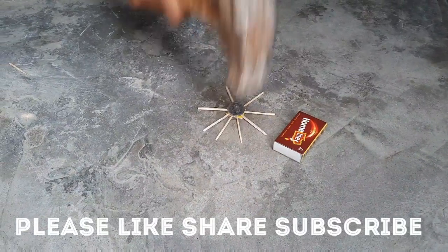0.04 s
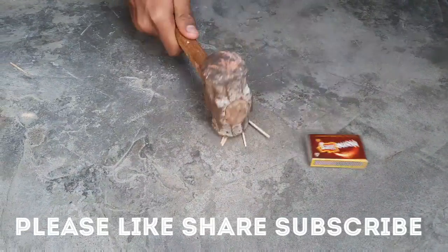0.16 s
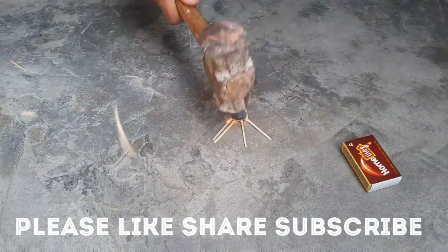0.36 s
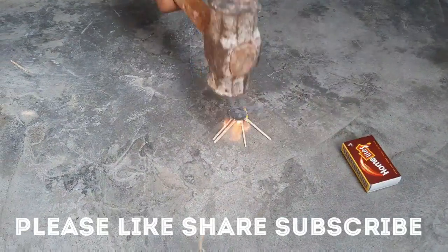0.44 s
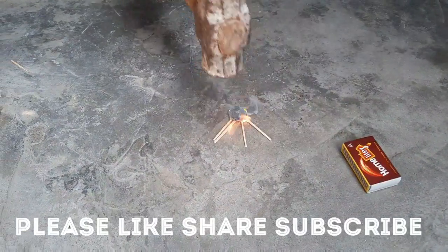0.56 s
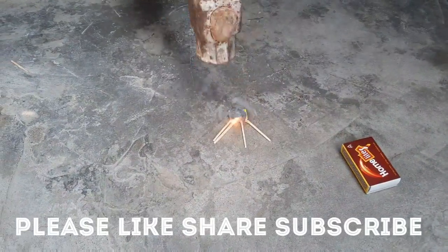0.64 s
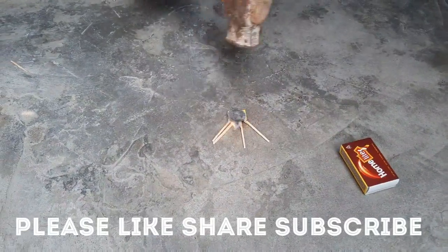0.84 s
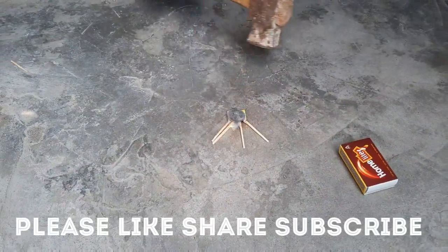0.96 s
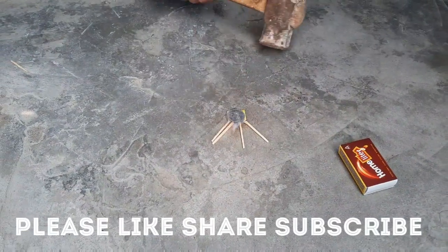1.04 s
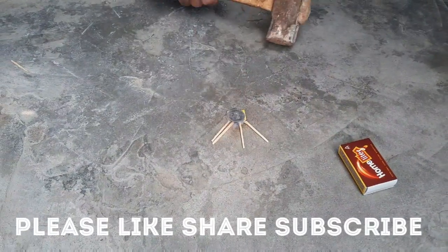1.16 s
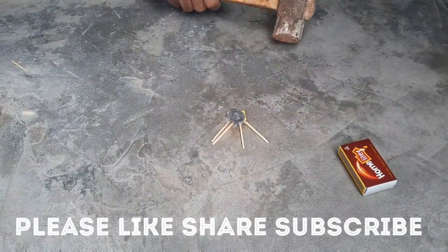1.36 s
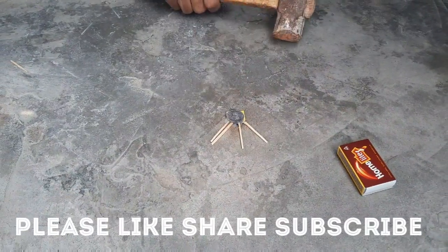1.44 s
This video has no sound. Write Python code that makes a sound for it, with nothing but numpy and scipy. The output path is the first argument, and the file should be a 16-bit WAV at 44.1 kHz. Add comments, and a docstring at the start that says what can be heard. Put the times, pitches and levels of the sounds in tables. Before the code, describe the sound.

One loud, echoing bang of match heads exploding under a hammer, then a few soft thuds.

```python
"""Sledgehammer on match heads

A hammer blow detonates a heap of match heads on a concrete floor. The crack overloads the microphone
and excites a hard room; the recorder's gain ducks and recovers slowly. Metal rings on in its normal
modes while the matches flare and sputter out. The hammer is then set down with three dull knocks."""
import sys
import numpy as np
from scipy import signal
from scipy.fft import rfft, irfft
from scipy.io import wavfile
from scipy.ndimage import uniform_filter1d

SR = 44100
rng = np.random.default_rng(int(sys.argv[2]) if len(sys.argv) > 2 else 0)


def generate_wav(signal):
    """Clip the signal to [-1, 1] and save it as 16-bit WAV at the path in sys.argv[1]."""
    frames = np.transpose(np.atleast_2d(signal))
    scaled = np.clip(frames, -1, 1) * 32767
    pcm = np.round(scaled).astype(np.int16)
    wavfile.write(sys.argv[1], SR, pcm)


N = 66150
T = np.arange(N) / SR
FREQS = np.maximum(np.arange(N // 2 + 1) * SR / N, 1)
CONTACT_S, DETONATION_S = .2353, .2371

# Left-right coherence of the sound field: f/Hz, coherence
COHERENCE = [(40, .9), (150, 0.96), (350, 0.54), (800, 0.39), (2000, 0.04), (16000, .01)]
# Room rumble and microphone hiss: f/Hz, octave level/dB
BACKGROUND_SPECTRUM = [(25, -79.5), (45, -62.5), (70, -47), (130, -46.5), (280, -47.5), (500, -59.5),
                       (1000, -72.5), (2500, -72), (5500, -70), (8100, -66), (9500, -72.5), (16000, -75.5)]
# Direct blast: f/Hz, octave level/dB
BLAST_SPECTRUM = [(30, -23.5), (60, -5), (200, 2), (700, -3), (2000, 5.5), (4500, 1), (8000, 4.5),
                  (16000, 6.5)]
# Reverberation: f/Hz, early octave level/dB, early T60/s, late octave level/dB, late T60/s
ROOM_DECAY = [(30.64, -45.5, 0.24, -62.5, .8), (65, -26, 0.14, -31.5, 1.0), (139, -19, 0.8, -27.5, 1.9),
              (303.2, -17, 0.68, -21.5, 1.15), (594, -5, 0.27, -20, 1.05), (1089, 0, 0.29, -15.5, 0.88),
              (2400, 3, 0.15, -10.5, 0.78), (3950, -4, 0.25, -21, 0.88), (8100, -10.5, .27, -22, .82),
              (16000, -21.5, .2, -34, .8)]
# Metal excited by the blow: f/Hz, level/dB, T60/s
METAL_MODES = [(355.3, -27, 1.55), (673, -18, .6), (787, -31, 2.2), (829, -32, 1.4), (931, -23, .85),
               (983, -16, .8), (1238, -36, 1.4)]
# Blast reflected by the walls: f/Hz, octave level/dB
ECHO_SPECTRUM = [(30, -22.5), (55, -3.5), (90, -12.5), (300, -5.5), (600, 0.5), (1200, 3.5), (2300, 6.5),
                 (4000, -1.5), (8000, -6.5), (16000, -8.5)]
# Burning match heads: f/Hz, octave level/dB
FLAME_SPECTRUM = [(500, -27), (2000, -5.5), (4000, -7), (8000, -3), (10500, 1), (13500, 0), (16000, 4)]
# Flares of the flame: t/s, duration/s, gain/dB
FLAME_FLARES = [(.42, 0.14, -46), (0.567, 0.044, -43.5), (0.687, 0.064, -51), (0.807, 0.032, -71)]
# Spits of the flame: t/s, gain/dB
FLAME_SPITS = [(0.8842, -44.5), (.9231, -55), (.9849, -71), (.9984, -48), (1.004, -64), (1.019, -50),
               (1.0403, -50), (1.0742, -50)]
# Hammer meeting the floor: t/s, relative thud level/dB, click gain/dB, ring gain/dB
HAMMER_CONTACTS = [(1.2709, 2, 1.5, -3.5), (1.3976, -3.5, -8, -7.5), (1.4198, -10, -47, -13)]
# Contact click: f/Hz, octave level/dB
CLICK_SPECTRUM = [(60, -45), (250, -13), (500, -23), (850, -26), (1200, -41), (1800, -37), (2600, -52),
                  (3900, -50), (7800, -49), (15000, -51)]
# Steel head, damped by the floor: f/Hz, level/dB, T60/s
HEAD_MODES = [(3590, -48, 0.052), (4140, -47.5, 0.051), (7950, -53, 0.044), (11600, -53, .03),
              (15200, -55, .03)]
# Microphone response: f/Hz, left gain/dB, right gain/dB
MIC_RESPONSE = [(60, 1, -1.5), (308, 0, 0.2), (1000, 2.5, 0), (2400, 2, 0), (4000, 1, -1),
                (6000, 1.5, -1.5), (7700, 6.5, 1), (8320, 4, -1), (9300, -7, -4.5), (12000, -7.5, -0.5),
                (15500, -5.5, -4)]


def from_db(db):
    """Amplitude ratio of a level in decibels."""
    return 10 ** (np.asarray(db) / 20)


def pan(db):
    """Level difference between the channels, positive to the left."""
    return from_db(db * np.array([[.5], [-.5]]))


def at_hz(points, hz, column=1):
    """Interpolation of a table column on a logarithmic frequency axis."""
    table = np.array(points)
    return np.interp(np.log(hz), np.log(table[:, 0]), table[:, column])


def burst(start, t60, hold=0, rise=1e-4):
    """Linear onset, with exponential decay from start + hold; times in seconds."""
    age = T - start
    return np.clip(age / rise, 0, 1) * 1000 ** (-np.maximum(age - hold, 0) / t60)


def pink(coherence_scale=1):
    """Spectrum of partially coherent stereo noise with unit power per octave."""
    coherence = np.clip(coherence_scale * at_hz(COHERENCE, FREQS), -1, 1)
    mid, side = rfft(rng.standard_normal((2, N)))
    white = np.sqrt(1 + coherence) * mid + np.sqrt(1 - coherence) * side * [[1], [-1]]
    return white * np.sqrt(SR / (4 * np.log(2) * FREQS)) * (FREQS > 20)


def noise(spectrum, coherence_scale=1):
    """Spectral shaping of stereo noise to given octave levels."""
    return irfft(pink(coherence_scale) * from_db(at_hz(spectrum, FREQS)), N)


def background():
    """Stationary noise: the room rumbles and the microphone hisses."""
    return noise(BACKGROUND_SPECTRUM)


def crack():
    """Impulsive excitation: the heads are crushed, then detonate in a broadband blast."""
    blast = noise(BLAST_SPECTRUM, coherence_scale=-.26) * pan(5.5)
    crunch = from_db(-19) * burst(CONTACT_S, t60=.2) * (T < DETONATION_S)
    detonation = burst(DETONATION_S, t60=.2, hold=.021)
    return blast * (crunch / blast.std() + detonation)


def reverberation():
    """Double-slope decay: early and late reflections add in power in each third-octave band."""
    field, tail = pink(), 0
    band = np.round(3 * np.log2(FREQS))
    for k in np.unique(band[FREQS > 20]):
        hz = 2 ** (k / 3)
        early_db, early_t60, late_db, late_t60 = (at_hz(ROOM_DECAY, hz, c) for c in (1, 2, 3, 4))
        early = from_db(early_db) * burst(DETONATION_S, early_t60, hold=.055, rise=.04)
        late = from_db(late_db) * burst(DETONATION_S, late_t60, hold=.055, rise=.04)
        tail = tail + irfft(field * (band == k), N) * np.hypot(early, late)
    return tail


def metal_ring():
    """Free vibration: lightly damped modes reach the two channels slightly out of phase."""
    ring = 0
    for hz, db, t60 in METAL_MODES:
        phase = 2 * np.pi * hz * T + rng.normal(0, .22, (2, 1))
        ring = ring + from_db(db) * burst(DETONATION_S, t60) * np.sin(phase)
    return ring


def wall_echo():
    """Reflection: the blast returns from the walls with less treble."""
    return noise(ECHO_SPECTRUM, coherence_scale=.05) * burst(.270, t60=.074, hold=.025, rise=.002)


def flame():
    """Combustion noise: the matches flare with a hiss, then spit a few times."""
    flares = sum(from_db(db) * burst(start, t60=.61, hold=duration, rise=.027)
                 for start, duration, db in FLAME_FLARES)
    spits = sum(from_db(db) * burst(start, t60=.065) for start, db in FLAME_SPITS)
    return noise(FLAME_SPECTRUM) * np.hypot(flares, spits)


def hammer_knocks():
    """Damped impact: each contact gives a low thud, a click, brief reverberation and a ring of steel."""
    rise, hold = .00223, .0015
    thud, noise_envelope, ring = np.zeros(N), 0, 0
    for start, thud_db, click_db, ring_db in HAMMER_CONTACTS:
        thud[int(start * SR)] = from_db(thud_db)
        click = from_db(click_db) * burst(start, t60=.036, hold=hold, rise=rise)
        room_tail = from_db(thud_db - 18.5) * burst(start, t60=.37, rise=.026)
        noise_envelope = noise_envelope + click + room_tail
        for hz, db, t60 in HEAD_MODES:
            envelope = from_db(ring_db + db) * burst(start, t60, hold, rise)
            ring = ring + envelope * np.sin(2 * np.pi * hz * (T - start))
    for _ in range(3):   # cascaded resonators round each impulse into a thud
        thud = resonate(thud, hz=215.3, width_hz=165)
    thud = -from_db(-7) * pan(1.5) * thud / np.abs(thud).max()
    return thud + noise(CLICK_SPECTRUM) * noise_envelope + ring


def resonate(x, hz, width_hz):
    """Second-order resonance with unit peak gain."""
    r = np.exp(-np.pi * width_hz / SR)
    feedback = [1, -2 * r * np.cos(2 * np.pi * hz / SR), r * r]
    return signal.lfilter(np.array([1, 0, -1]) * (1 - r * r) / 2, feedback, x + 1e-18)


def scene():
    """Superposition of all sources at the two microphones."""
    return background() + crack() + reverberation() + metal_ring() + wall_echo() + flame() + hammer_knocks()


def gain_control(x, threshold_db=-7, release_db_per_s=2.5, window_s=.0018):
    """Limiting: the gain falls at once when mean power passes the threshold, then recovers slowly."""
    power = uniform_filter1d(np.mean(x ** 2, axis=0), int(window_s * SR))
    excess_db = np.maximum(10 * np.log10(np.maximum(power, 1e-12)) - threshold_db, 0)
    recovery_db = release_db_per_s * T
    return x * from_db(recovery_db - np.maximum.accumulate(excess_db + recovery_db))


def record(dry):
    """Saturation in the capsules, dispersion and colour in their ports, then limiting and a low-pass."""
    overload, port_hz, cutoff_hz = from_db(6.5), 2500, 15750
    saturated = overload * np.tanh(dry / overload)
    pole = np.exp(-2 * np.pi * port_hz / SR)
    dispersed = signal.lfilter([-pole, 1], [1, -pole], saturated)   # all-pass
    hz = np.maximum(np.arange(N + 1) * SR / (2 * N), 1)
    response = from_db([at_hz(MIC_RESPONSE, hz, column) for column in (1, 2)])
    coloured = irfft(rfft(dispersed, 2 * N) * response)[:, :N]
    clipped = np.clip(gain_control(coloured), -1, 1)
    return signal.sosfilt(signal.ellip(10, .1, 70, cutoff_hz, fs=SR, output="sos"), clipped)


dry = scene()
out = record(dry)
generate_wav(out)
```